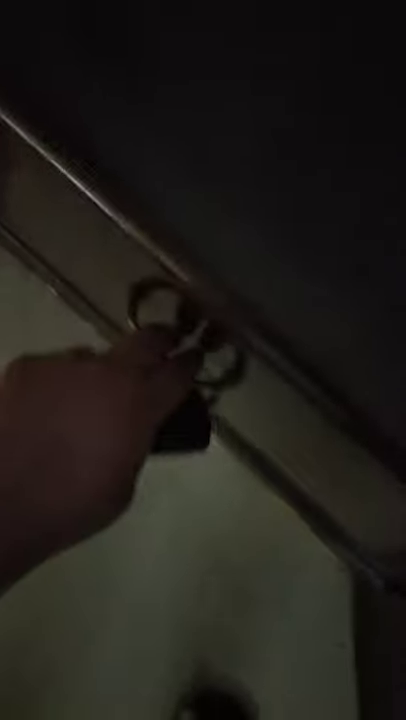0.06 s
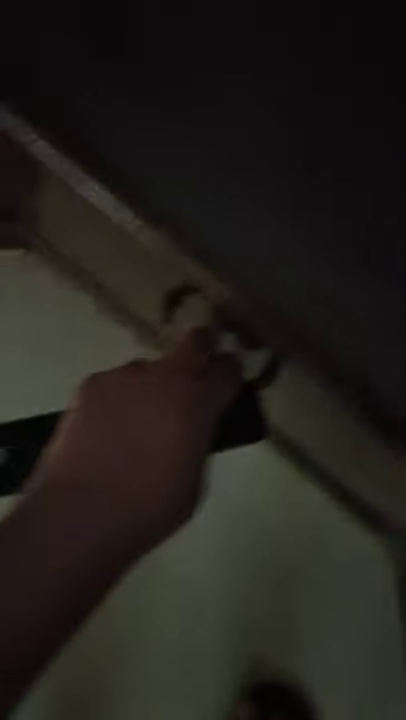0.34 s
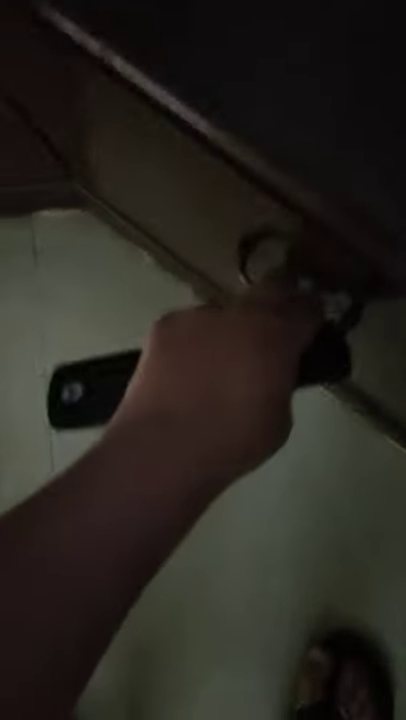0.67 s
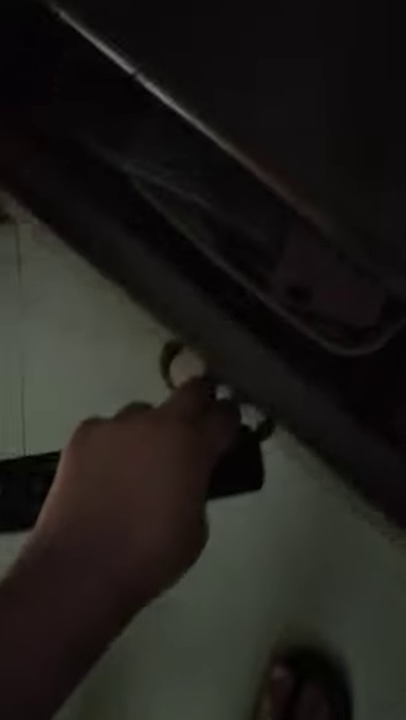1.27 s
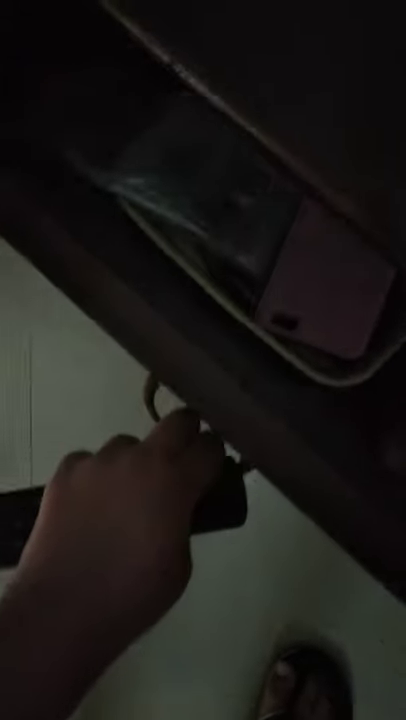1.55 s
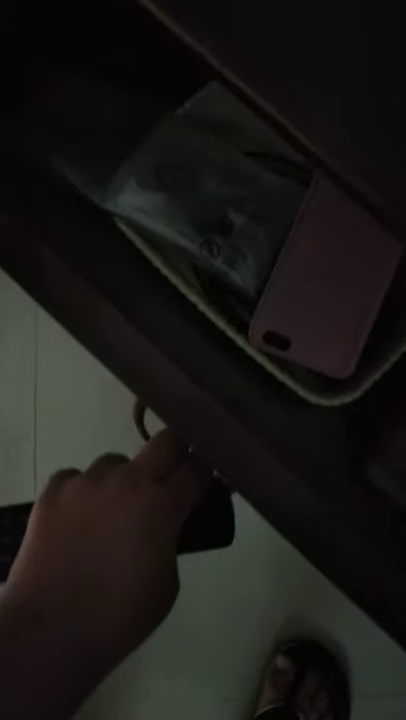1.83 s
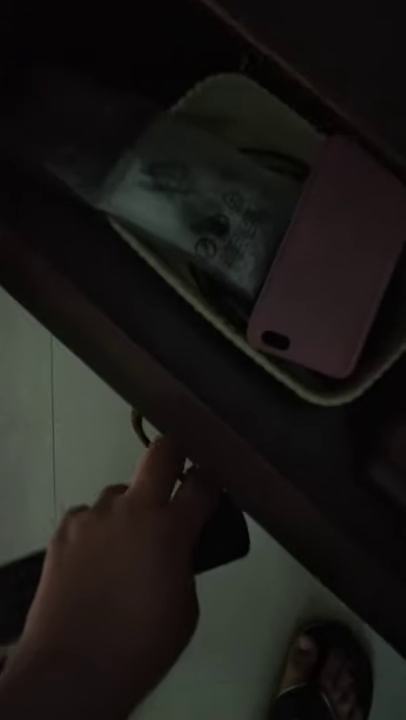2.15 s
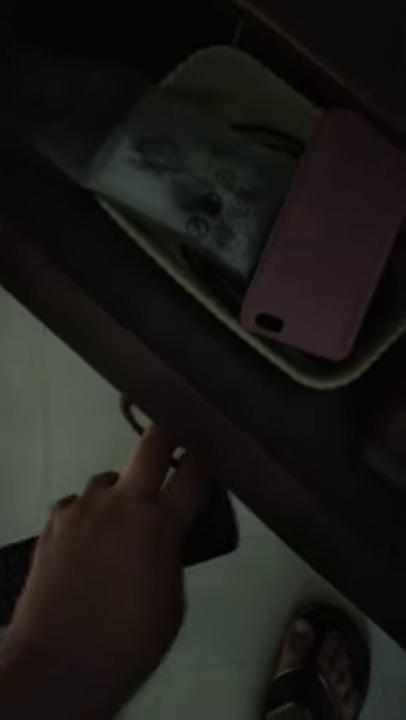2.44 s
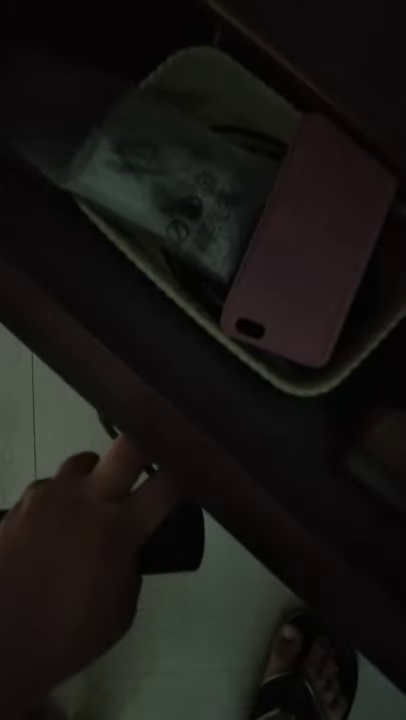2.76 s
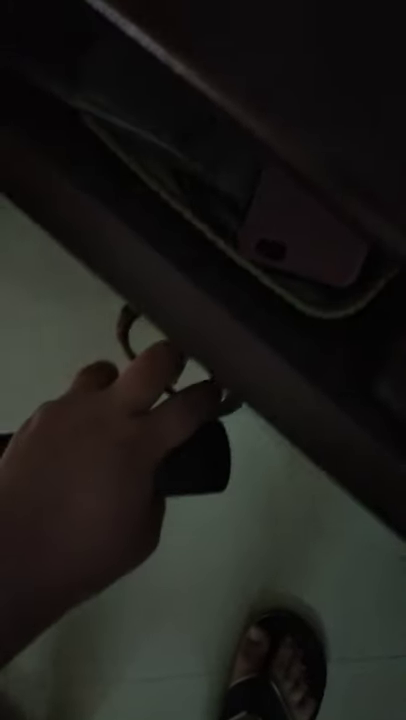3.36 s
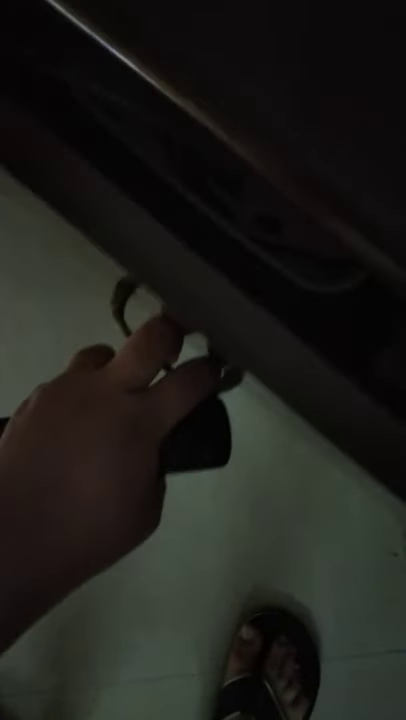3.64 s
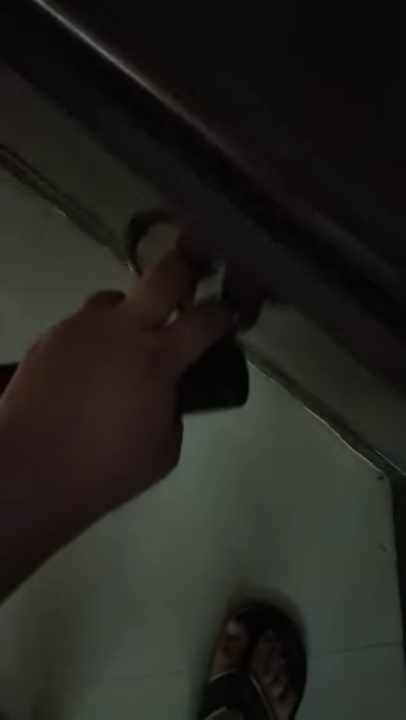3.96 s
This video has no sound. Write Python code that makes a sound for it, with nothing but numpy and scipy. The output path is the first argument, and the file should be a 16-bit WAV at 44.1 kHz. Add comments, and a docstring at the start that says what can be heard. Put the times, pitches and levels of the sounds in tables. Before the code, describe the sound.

High, chirping squeaks from a wooden drawer sliding open and rattling closed in a quiet room.

```python
"""A squeaky wooden drawer

A drawer is pulled open by its ring handles, rests, and is pushed shut, close by in a quiet tiled room.
Its dry runners stick and slip in short squeaks, some pure, some raspy. The sliding box rumbles, scrapes
and knocks in its frame, small hard things tick, and the room rings on after each squeak."""
import sys
import numpy as np
from scipy import signal
from scipy.fft import rfft, irfft
from scipy.io import wavfile

SR = 44100
rng = np.random.default_rng(int(sys.argv[2]) if len(sys.argv) > 2 else 0)


def pcm_store(signal):
    """Save signal as 16-bit PCM."""
    levels = np.round(np.clip(np.atleast_2d(signal), -1, 1) * 32767)
    wavfile.write(sys.argv[1], SR, levels.astype(np.int16).T)


N = 176400  # 4 seconds


def undb(db):
    """Turn decibels into a number to multiply by."""
    return 10 ** (np.asarray(db) / 20)


def unit(x):
    """Scale a sound to an average (rms) level of 1."""
    return x / np.sqrt(np.mean(x ** 2) + 1e-20)


def at_hz(points, hz):
    """Look up a pitch between rows of (pitch_hz, value), spaced by octaves."""
    pitches, values = np.array(points, float).T
    return np.interp(np.log(np.maximum(hz, 1)), np.log(pitches), values)


def curve(rows):
    """Join rows of (time_s, level_db) into a volume curve."""
    return undb(np.interp(np.arange(N) / SR, *np.array(rows).T))


def colour(x, points):
    """Shape bass and treble by rows of (pitch_hz, level_db), then scale to level 1."""
    gains = undb(at_hz(points, np.fft.rfftfreq(len(x), 1 / SR)))
    return unit(irfft(rfft(x) * gains, len(x)))


def wander(hz):
    """Drift to a new random value hz times a second."""
    return unit(np.interp(np.arange(N) / SR * hz, np.arange(N), rng.standard_normal(N)))


def fade(t, fade_s):
    """Die away by 60 dB every fade_s seconds."""
    return np.exp(-np.log(1000) * t / fade_s)


def add(out, start_s, x):
    """Mix x into out at a given time."""
    i = max(int(start_s * SR), 0)
    out[i:i + len(x)] += x[:max(len(out) - i, 0)]


# Tone of the room's own noise: pitch_hz, level_db
BACKGROUND_COLOUR = [(25, -25.5), (45, -18), (70, -6), (130, 4.5), (190, -11.5), (350, -8), (600, -12),
                     (1100, -17.5), (2500, -32), (4000, -31.5), (6800, -30), (8600, -42.5), (15000, -53.5)]

def background():
    """Faint room noise with a low, wavering drone."""
    drone_hz, waver_hz = 95.6, 4.9
    phase = 2 * np.pi * drone_hz * np.arange(N) / SR
    drone = unit((1 + wander(waver_hz)) * np.sin(phase) + wander(waver_hz) * np.cos(phase))
    return undb(-53.5) * colour(rng.standard_normal(N), BACKGROUND_COLOUR) + undb(-57.5) * drone


# How long the room rings: pitch_hz, fade_s
ROOM_FADES = [(150, 0.86), (1500, .55), (4000, 0.54), (7500, 0.41), (14000, 0.21)]

def room(x):
    """Add quick echoes from the furniture and a tail that loses its treble first."""
    t = np.arange(int(SR * .8)) / SR
    hz = np.fft.rfftfreq(len(t), 1 / SR)
    spectrum = rfft(rng.standard_normal(len(t)))
    tail = 0
    for centre, fade_s in ROOM_FADES:
        band = at_hz([(f, f == centre) for f, _ in ROOM_FADES], hz)
        tail = tail + irfft(spectrum * band, len(t)) * fade(t, fade_s)
    early = rng.standard_normal(len(t)) * fade(t, fade_s=.059)
    arrived = t > .004  # the first echo takes 4 ms
    echo = (undb(-10.5) * unit(tail * arrived) + undb(-9) * unit(early * arrived)) / np.sqrt(len(t))
    return x + signal.fftconvolve(x, echo)[:N]


def hits(rows, tone, fade_s):
    """Each hit is a burst of noise that dies quickly."""
    out, t = np.zeros(N), np.arange(SR // 8) / SR
    for start, db in rows:
        burst = fade(t, fade_s) * rng.standard_normal(len(t))
        add(out, start, undb(db) * burst)
    return colour(out, tone) * np.sqrt(np.mean(out ** 2))


# Light taps: start_s, level_db
TICKS = [(.019, -47.5), (.170, -28.5), (.244, -36), (.379, -49.5), (.708, -37), (.957, -31.5), (1.107, -31),
         (1.665, -30), (2.140, -46), (2.969, -40), (3.071, -40), (3.118, -34.5)]
# Their bright tone: pitch_hz, level_db
TICK_COLOUR = [(800, -17.5), (2200, -10), (3800, -1), (6000, 11), (7300, 1.5), (8800, -17), (15000, -34.5)]

def ticks():
    """The handles and small loose things tap against the drawer."""
    return hits(TICKS, TICK_COLOUR, fade_s=.013)


# Chirps of the wood during the push: start_s, length_s, pitch_hz, level_db
CHIRPS = [(3.42, 0.0097, 1340, -33), (3.700, 0.012, 1064, -47.5)]

def chirps():
    """The frame gives brief, dull notes."""
    out = np.zeros(N)
    for start, length, hz, db in CHIRPS:
        t = np.arange(int(length * SR)) / SR
        swell = np.sin(np.pi * t / length)
        add(out, start, undb(db) * np.sqrt(2) * swell * np.sin(2 * np.pi * hz * t))
    return out


# Rumble while pulling and while pushing: time_s, level_db
PULL_RUMBLE = [(0.75, -56), (1.024, -27.5), (1.066, -40), (1.26, -31), (1.364, -41), (1.412, -25.5),
               (1.498, -39), (2.156, -45.5), (2.184, -49), (2.306, -63), (2.316, -64), (2.45, -66)]
PUSH_RUMBLE = [(2.92, -51), (2.94, -53), (2.974, -31.5), (3.06, -26.5), (3.46, -33.5), (3.568, -49),
               (3.86, -38.5), (3.924, -30.5), (4.0, -50)]
# Its deep tone: pitch_hz, level_db
RUMBLE_COLOUR = [(25, -17), (42, -16), (55, -10.5), (72, 6), (100, 2), (135, 0), (180, -1), (215, -7),
                 (255, -5), (310, -23.5), (420, -28.5), (600, -34), (1200, -71)]

def rumble():
    """The box shakes as it rides on its runners."""
    t = np.arange(N) / SR
    effort = 0
    for rows in (PULL_RUMBLE, PUSH_RUMBLE):
        fade_in = np.clip((t - rows[0][0]) / .02, 0, 1)
        fade_out = np.clip(1 - (t - rows[-1][0]) / .12, 0, 1)
        effort = effort + curve(rows) * fade_in * fade_out
    return colour(rng.standard_normal(N), RUMBLE_COLOUR) * effort * undb(-5.5)


# Notes the wooden box rings at: pitch_hz, fade_s, level_db
BOX_NOTES = [(74.5, 0.22, -26.5), (158, 0.2, -16.5), (254.5, 0.28, -13.5), (408, 0.13, -15.5),
             (749, 0.054, -14), (1024, 0.12, -21.5), (1334, 0.065, -16), (1993, 0.11, -13),
             (2216, .035, -19)]

def box(x):
    """The drawer's panels add their ring to whatever shakes them."""
    t = np.arange(SR // 3) / SR
    ring = sum(undb(db) * unit(fade(t, fade_s) * np.cos(2 * np.pi * hz * t))
               for hz, fade_s, db in BOX_NOTES)
    return x + signal.fftconvolve(x, ring / np.sqrt(len(t)))[:N] * undb(-6.5)


# How the scrape rises and falls: time_s, level_db
SCRAPE_LEVELS = [(0.0, -66), (0.27, -57.5), (1.21, -54.5), (1.26, -34), (1.27, -51), (1.88, -60),
                 (2.18, -46), (2.36, -71), (2.95, -57), (2.97, -30.5), (3.01, -45.5), (3.1, -38.5),
                 (3.39, -43), (3.42, -45), (3.51, -49), (4.0, -48.5)]
# Its tone: pitch_hz, level_db
SCRAPE_COLOUR = [(100, -10.5), (170, 4.5), (255, 3.5), (330, -0.5), (440, -0.5), (600, -10), (1400, -7),
                 (2000, -10), (3500, -8), (6800, -11.5), (8800, -53), (15000, -55.5)]

def scrape():
    """Wood slides on wood, and its grain makes many tiny, uneven catches."""
    catches_per_s, spread_db = 1400, 3
    catches = (rng.random(N) < catches_per_s / SR) * rng.choice([-1, 1], N)
    sizes = undb(spread_db * np.minimum(rng.exponential(size=N), 3))
    rubbing = colour(catches * sizes, SCRAPE_COLOUR)
    return unit(box(rubbing)) * curve(SCRAPE_LEVELS) * undb(-1.5)


# Sharp wooden knocks: start_s, level_db
KNOCKS = [(.273, -34.5), (.814, -44), (.982, -37), (1.222, -41.5), (1.247, -37), (1.389, -30), (1.665, -38),
          (1.765, -55), (2.051, -36), (2.839, -39.5), (2.967, -28.5), (3.031, -27), (3.049, -27),
          (3.064, -23), (3.071, -22), (3.093, -21), (3.104, -26), (3.118, -19.5), (3.135, -22.5),
          (3.152, -21), (3.164, -29), (3.205, -25.5)]
# Their tone: pitch_hz, level_db
KNOCK_COLOUR = [(40, -32), (90, -6.5), (250, 8), (500, 5), (800, 6.5), (1400, 5.5), (2500, 5), (4000, 0),
                (6800, -11.5), (8800, -46.5), (15000, -53.5)]

def knocks():
    """The box strikes its frame and its panels ring."""
    return box(hits(KNOCKS, KNOCK_COLOUR, fade_s=.033)) * undb(-3.5)


# Hollow bumps: start_s, level_db
BUMPS = [(.985, -35.5), (2.162, -38.5), (2.182, -35), (2.966, -31.5), (3.030, -30.5), (3.092, -28)]
# Their low tone: pitch_hz, level_db
BUMP_COLOUR = [(50, -14.5), (110, -2.5), (180, 6), (300, -11.5), (600, -12.5), (1000, -22), (2500, -54),
               (8000, -71)]

def bumps():
    """The box thuds as it starts to move and as it comes to rest."""
    return hits(BUMPS, BUMP_COLOUR, fade_s=.1495)


# Slips of the runners (roughness 0 is pure, about 1 is very raspy):
# start_s, length_s, first_pitch_hz, middle_pitch_hz, last_pitch_hz, level_db, roughness
SQUEAKS = [ (0.68, 0.019, 5660, 5650, 5600, -17.5, 0.04), (0.751, 0.034, 4280, 4025, 4150, -26.5, .1),
           (0.774, 0.025, 4260, 4300, 3900, -22, 0.31), (0.811, 0.025, 5000, 5122, 5130, -11.5, 0.08),
           (0.835, 0.024, 5250, 5615, 5220, -19, 0.35), (0.861, 0.031, 4320, 4214, 4280, -15, 0.11),
           (0.886, 0.014, 4270, 4060, 3900, -18.5, 0.32), (0.895, 0.03, 4826, 4924, 5200, -19.5, 0.33),
           (1.175, 0.011, 5810, 5780, 5650, -14, 0.1), (1.234, 0.015, 3830, 3860, 3750, -18, 0.49),
           (1.248, 0.02, 4550, 4230, 4050, -9, 0.37), (1.285, 0.03, 4070, 4114, 4100, -16, 0.4),
           (1.311, .014, 3800, 3590, 3700, -12.5, 0.24), (1.322, .017, 3750, 3820, 3750, -16.5, 0.1),
           (1.347, 0.028, 3937, 3860, 3500, -30.5, 1), (1.419, 0.023, 4150, 4320, 4200, -34, 0.55),
           (1.447, .015, 4220, 4240, 4200, -21, 0.63), (1.488, 0.0097, 3720, 3730, 3600, -20.5, 0.59),
           (1.568, 0.011, 3750, 3914, 3740, -18.5, 0.31), (1.598, 0.012, 3860, 3986, 3850, -17, 0.22),
           (1.602, 0.012, 5590, 5400, 5300, -38, 0.2), (1.753, 0.023, 3700, 3374, 2964, -22, 0.62),
           (1.762, 0.015, 4800, 4937, 4900, -9.5, 0.1), (1.778, 0.0081, 3900, 3860, 3600, -18, 0.3),
           (1.798, 0.02, 3910, 3556, 3390, -19, 0.54), (1.816, .026, 4810, 4926, 4870, -9, 0.02),
           (1.861, .018, 3130, 3303, 3350, -20, 0.51), (1.885, 0.022, 3130, 3190, 3400, -25, 0.3),
           (1.921, 0.026, 3300, 3357, 3450, -26.5, 0.6), (1.936, 0.026, 3337, 3190, 3250, -28, 0.54),
           (1.967, 0.029, 3393, 3550, 3550, -26, 0.6), (1.991, 0.019, 3493, 3610, 3550, -17, 0.4),
           (2.006, 0.031, 4000, 4026, 3980, -19.5, 0.23), (2.024, 0.0092, 3000, 3040, 3100, -19.5, 0.8),
           (2.036, 0.025, 3970, 3887, 4100, -19, 0.5), (2.048, .023, 2390, 3404, 3760, -24, 0.6),
           (2.218, 0.0385, 3974, 3955, 4065, -19.5, 0.11), (2.246, 0.039, 4080, 4008, 4000, -24, 0.09),
           (2.305, 0.019, 3996, 4024, 4130, -31, 0.07), (3.216, 0.0089, 3420, 3450, 3550, -13, .4),
           (3.224, 0.016, 4336, 4440, 4890, -11, 0.7), (3.316, 0.014, 3266, 3370, 2960, -14.5, 0.54),
           (3.422, 0.038, 3686, 3894, 4100, -18, 0.37), (3.451, 0.021, 4040, 3858, 3400, -15.5, 0.45),
           (3.542, 0.01, 3440, 3830, 3750, -13, 0.09), (3.559, 0.013, 3890, 3790, 3100, -16.5, 0.69),
           (3.615, 0.0089, 4740, 4904, 4800, -0.5, 0.1), (3.624, 0.023, 3784, 3930, 3350, -18, 0.58),
           (3.647, 0.0098, 4890, 4940, 4720, -5, 0.14), (3.697, 0.025, 4810, 4954, 5200, -10, 0.2),
           (3.724, .027, 5127, 5203, 5110, -11.5, 0.07), (3.801, 0.021, 3850, 3913, 3500, -18, 0.29),
           (3.827, 0.013, 3674, 3430, 3200, -25.5, 1.09), (3.847, 0.016, 3970, 3820, 3650, -19, 0.35),
           (3.903, 0.0099, 3830, 3860, 3850, -21, 0), (3.942, 0.014, 3670, 4150, 4000, -21.5, 0.46),
           (3.960, 0.016, 3540, 3725, 3700, -21, 0.41), (3.981, 0.02, 3470, 3190, 3150, -26.5, 0.38)]
# Strength of an overtone by where it lands: pitch_hz, level_db
OVERTONES = [(5800, -4.5), (6700, 1), (7300, -7.5), (7800, -19.5), (8400, -29), (9000, -37), (10000, -37.5),
             (11000, -47), (12000, -51), (13200, -49.5), (15000, -43.5)]
# Tone of the hiss in a rough squeak: pitch_hz, level_db
RASP_COLOUR = [(600, -18.5), (1300, -27), (1900, -9), (2700, 0.5), (4000, 16.5), (5500, 6.5), (7200, 3.5),
               (7900, -6.5), (8800, -31), (10500, -16.5), (15000, -32)]

def squeaks():
    """Each slip of a dry runner sings one gliding note; a rough one flutters, rasps and drops in pitch."""
    wobble_hz, flutter_hz = 751.8, 450
    wobble_share, flutter_db, drop_share = .06, 4.5, .36  # at roughness 1
    rise_s, fall_s, drop_s = .0011, .0014, .0035
    rise_at_s, fall_before_end_s = .0021, .0038  # where the swell is near half strength
    margin = 10 * fall_s
    noises = np.array([wander(wobble_hz), wander(flutter_hz),
                       colour(rng.standard_normal(N), RASP_COLOUR)])
    out = np.zeros(N)
    for start, length, first, middle, last, db, rough in SQUEAKS:
        t = np.arange(-margin, length + margin, 1 / SR)
        wobble, tremble, rasp = noises.take(int(start * SR) + np.arange(len(t)), axis=1, mode="wrap")
        hz = np.interp(t, [0, length / 2, length], [first, middle, last])
        hz *= 1 + rough * wobble_share * wobble
        # The pitch drops as the runner catches again.
        hz *= 1 - drop_share * rough * np.exp(np.minimum(t - length, 0) / drop_s)
        phase = 2 * np.pi * np.cumsum(hz) / SR
        rise = 1 / (1 + np.exp((rise_at_s - t) / rise_s))
        fall = 1 / (1 + np.exp((t - length + fall_before_end_s) / fall_s))
        swell = rise * fall
        tone = np.sin(phase)
        for k in range(2, 5):
            strength = undb(at_hz(OVERTONES, k * hz)) * (k * hz < SR / 2)
            tone += np.sqrt(swell) * strength * np.sin(k * phase)
        flutter = unit(undb(rough * flutter_db * tremble))
        voice = np.sqrt(2) * tone + rough ** 2 * undb(-5.5) * rasp
        add(out, start - margin, undb(db) * swell * flutter * voice)
    return out


def scene():
    """The drawer in its room, on one channel."""
    drawer = squeaks() + chirps() + rumble() + scrape() + knocks() + bumps() + ticks()
    return (room(drawer) + background())[None]


def record(dry):
    """Cut away the very highest treble."""
    top_hz = 15850
    return signal.sosfilt(signal.ellip(12, .2, 80, top_hz, fs=SR, output="sos"), dry)


dry = scene()
out = record(dry)
pcm_store(out)
```